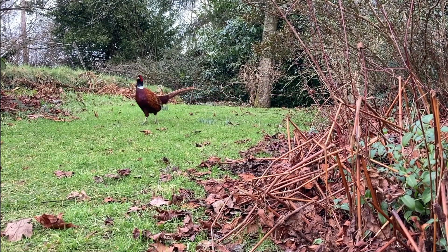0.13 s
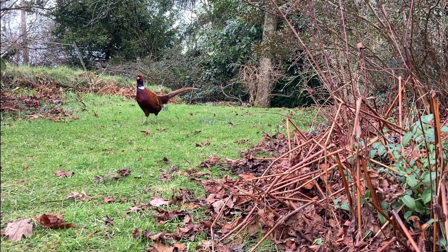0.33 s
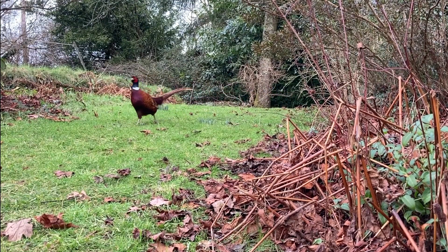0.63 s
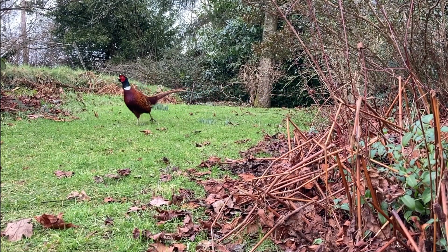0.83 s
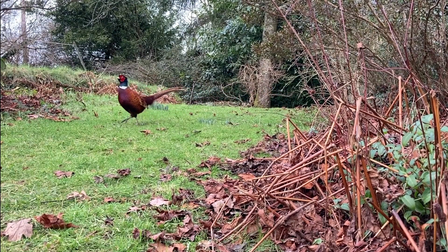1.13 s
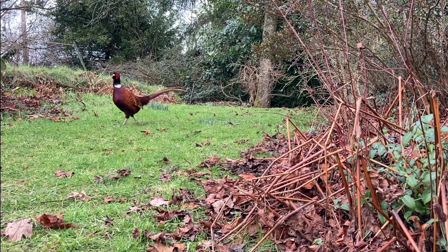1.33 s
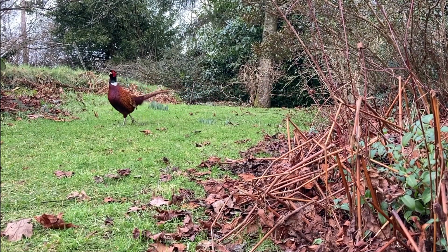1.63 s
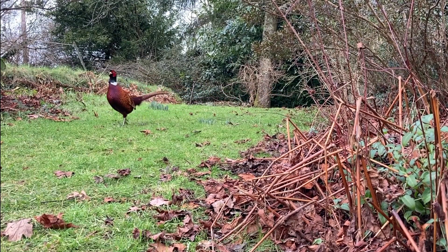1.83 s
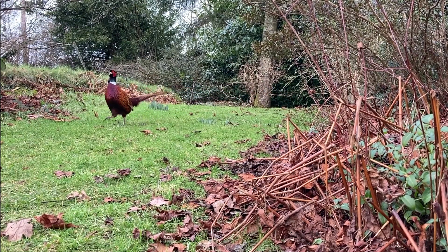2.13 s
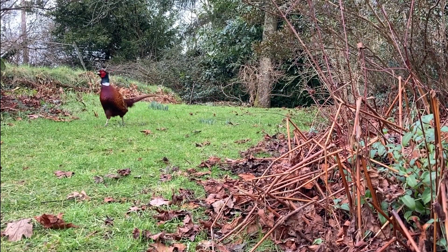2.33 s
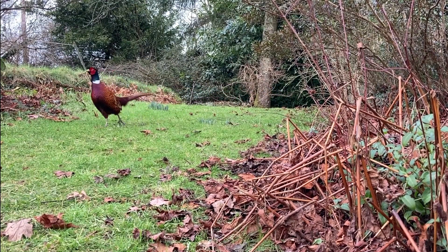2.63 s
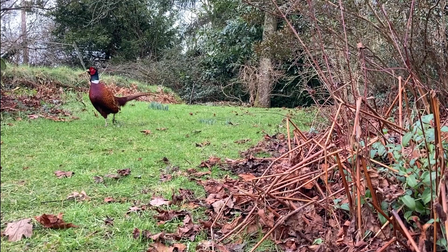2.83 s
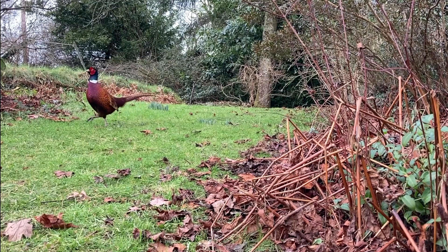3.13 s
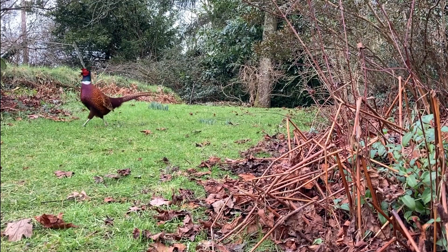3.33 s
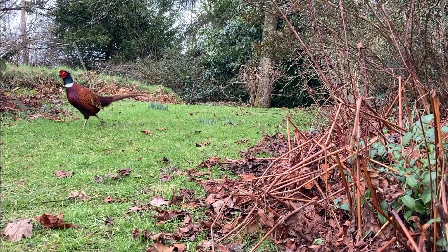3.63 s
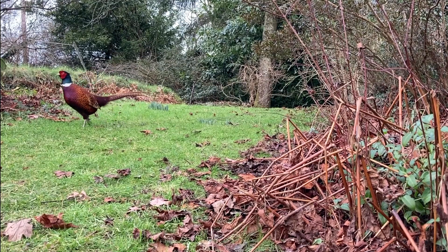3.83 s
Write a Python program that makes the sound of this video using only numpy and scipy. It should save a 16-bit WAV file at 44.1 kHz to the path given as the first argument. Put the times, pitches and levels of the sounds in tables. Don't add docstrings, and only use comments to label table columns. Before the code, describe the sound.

Pheasant cackle: a hurried run of short, raspy, falling clucks from 0 to 1.4 s, loudest at the start and receding. A far crow caws low at 0.2 s; soft wing thumps at 0.8 and 1.4 s. Two faint crow caws at 2.0 and 2.4 s, then one sharp nearer cluck at 3.0 s. A tiny leaf tick at 3.6 s. Quiet traffic rumble and air hiss throughout; light outdoor echo.

```python
import sys
import numpy as np
from scipy import signal
from scipy.fft import rfft, irfft, next_fast_len
from scipy.io import wavfile
from scipy.ndimage import uniform_filter1d, minimum_filter1d, map_coordinates

SR = 44100
rng = np.random.default_rng(int(sys.argv[2]) if len(sys.argv) > 2 else 0)


def master(y):
    cut = np.clip(np.atleast_2d(y).T, -1, 1)
    pcm = np.round(cut * 32767)
    wavfile.write(sys.argv[1], SR, pcm.astype(np.int16))


def boost(x):
    u = np.asarray(x, float) / 20
    return 10 ** u


N = 176400

# (time [s], level [dB])
TRAFFIC_LEVEL = [
    (0.0, -67),
    (0.19, -57.5),
    (0.3, -66),
    (0.62, -57),
    (0.68, -60.5),
    (0.77, -59.5),
    (4.0, -61.5),
]
# (frequency [Hz], level [dB per Hz])
TRAFFIC_COLOUR = [(12, -30), (20, -20), (35, -5.5), (59, 6), (113, -3), (166, -8), (195, -14), (300, -35.5),
                  (390, -88), (660, -120)]
# (frequency [Hz], level [dB per Hz])
AIR_COLOUR = [(150, -14), (250, -6), (1130, -19.5), (1250, -21.5), (1570, -23), (2780, -25), (8200, -33.5),
              (10700, -77), (18000, -120)]
# (frequency [Hz], level [dB per Hz])
AIR_WIDE_COLOUR = [(150, -29), (250, -2), (744, 4.5), (827, -8.5), (997, 1.5), (1550, -8.5), (6000, -14),
                   (7800, -59), (13200, -120)]
# (frequency [Hz], level [dB per Hz])
HISS_COLOUR = [(5000, -44), (7000, -5.5), (9000, -14), (12000, -0.5)]
# (time [s], level [dB])
LEAF_TICKS = [
    (2.996, -66),
    (3.636, -63),
]
# (time [s], pitch [Hz], level [dB])
WING_THUMPS = [
    (0.843, 95.6, -47.5),
    (1.438, 65.4, -50.5),
]
# (delay [s], level [dB])
BANK_ECHOES = [
    (.006, -3.5),
    (0.012, -4),
    (0.019, -13.5),
    (.034, -17.5),
    (0.046, -24),
    (0.064, -20.5),
]
# (frequency [Hz], time to fall 60 dB [s])
TREE_RING = [(500, 0.9), (1400, 0.45), (3500, 0.43), (9000, 0.37)]
# (time [s], length [s], pitch [Hz], level [dB])
CROW_CAWS = [
    (0.236, 0.14, 241.1, -50),
    (2.047, 0.181, 328.9, -55.5),
    (2.359, 0.176, 329.4, -60),
]
# (centre [Hz], width [Hz], level [dB])
BEAK_TONES = [(1300, 370, 4.5), (1760, 264, 5.5), (2176, 450, 2.5), (3007, 300, -0.5)]
# (time [s], length [s], first pitch [Hz], last pitch [Hz], level [dB])
CACKLE_CLUCKS = [(-.01, 0.04, 1435, 1374, -45), (.007, 0.026, 1399, 1018, -31.5),
                 (0.032, .03, 991.4, 885, -36), (0.057, .04, 1148, 900, -38.5),
                 (0.084, 0.039, 933, 751, -42.5), (0.172, 0.051, 1154, 771, -42.5),
                 (.225, .055, 1023, 705, -44.5), (.385, 0.041, 909, 632, -41.5),
                 (.405, .05, 1150, 720, -45), (.416, .066, 1380, 850, -35.5), (.565, .043, 1145, 699, -40),
                 (0.578, 0.05, 1170, 861.6, -39), (0.634, 0.046, 1121, 793, -41),
                 (0.687, .04, 1042, 802, -53), (0.719, 0.04, 1142, 663, -47),
                 (0.759, 0.046, 1068, 716, -49.5), (0.852, .05, 1194, 744, -42.5),
                 (.916, 0.033, 1300, 945, -48), (0.967, 0.034, 928, 638, -39.5),
                 (0.997, .045, 1060, 777, -57), (1.17, 0.057, 1182, 883, -40),
                 (1.316, 0.045, 1185, 634, -44), (1.348, 0.034, 891, 577, -51)]
# (frequency [Hz], level [dB])
FAR_THROAT_COLOUR = [(600, -2.5), (1200, -4), (1900, 8), (2650, 0.5), (3150, -14.5), (4300, -9.5),
                     (6500, -23.5), (11000, -29.5)]
# (centre [Hz], width [Hz])
FAR_PIPE = [(3080, 300), (6100, 860)]
# (time [s], length [s], first pitch [Hz], last pitch [Hz], level [dB])
COCK_CLUCK = [
    (2.995, 0.023, 1190, 1490, -64),
    (3.017, 0.028, 1401, 1077, -30),
    (3.046, 0.0232, 924, 753, -37),
]
# (frequency [Hz], level [dB])
NEAR_THROAT_COLOUR = [(800, -12), (1300, 1), (1700, 10.5), (2400, 8.5), (4200, -3), (5300, -8.5),
                      (7400, -6), (11000, -25.5)]
# (centre [Hz], width [Hz])
NEAR_PIPE = [(3100, 1160), (6000, 2200)]
# (low edge [Hz], high edge [Hz])
SUM_GAPS = [(8350, 9700), (11700, 23000)]
# (low edge [Hz], high edge [Hz])
DIFFERENCE_GAPS = [(6300, 7900), (10300, 23000)]

FAR_LAG_S, FAR_LAG_GROWS = 0.000098, 0.9e-4


def along(points, hz):
    f, value = np.transpose(points)
    return np.interp(np.log(hz + 1), np.log(f + 1), value)


def unit(x):
    return x / np.sqrt(np.mean(x ** 2) + 1e-20)


def wobble(n, rate_hz, rows=1):
    knots = rng.standard_normal((rows, 64 + int(4 * N / SR * 5)))
    at = np.arange(n) * rate_hz / SR
    return np.array([map_coordinates(k, [at], mode="wrap") for k in knots])


def filtered(x, response):
    m = next_fast_len(x.shape[-1] + 8192)
    spectrum = rfft(x, m) * response(np.fft.rfftfreq(m, 1 / SR))
    return irfft(spectrum, m)[..., :x.shape[-1]]


def noise(colour):
    return unit(filtered(rng.standard_normal(N), lambda f: boost(along(colour, f)) * (f < colour[-1][0])))


def add(out, x, s):
    i = round(s * SR)
    x = x[:, max(-i, 0):N - i]
    out[:, max(i, 0):max(i, 0) + x.shape[1]] += x


def stereo(mid, side):
    return np.array([mid + side, mid - side])


def traffic():
    s, db = np.transpose(TRAFFIC_LEVEL)
    swell_db = 1.6 * wobble(N, 4.52)[0]
    level = boost(np.interp(np.arange(N) / SR, s, db) + swell_db)
    wide = filtered(noise(TRAFFIC_COLOUR), lambda f: boost(6.5 * np.log2(f / 60 + 0.089)))
    return stereo(level * noise(TRAFFIC_COLOUR), level * boost(-21.5) * wide)


def air():
    level = boost(-71 + 0.29 * wobble(N, 2.16)[0])
    return stereo(level * noise(AIR_COLOUR), boost(-74) * noise(AIR_WIDE_COLOUR))


def microphone_hiss():
    return stereo(boost(-86) * noise(HISS_COLOUR), boost(-78.5) * noise(HISS_COLOUR))


def leaf_ticks():
    out, t = np.zeros((2, N)), np.arange(SR // 10) / SR
    t60_s = 0.013
    for s, db in LEAF_TICKS:
        add(out, boost(db - 60 * t / t60_s) * rng.standard_normal((2, len(t))), s)
    return out


def wing_thumps():
    out, t = np.zeros((2, N)), np.arange(SR // 10) / SR
    length_s = 0.041
    for s, hz, db in WING_THUMPS:
        swell = np.sin(np.pi * np.minimum(t / length_s, 1)) ** 2
        add(out, boost(db) * np.sin(2 * np.pi * hz * t) * swell * [[1], [1]], s)
    return out


def garden(x, lag_s, early_db, wet_db):
    hz, t, z = signal.stft(rng.standard_normal((2, int(0.6 * SR))), SR, nperseg=256)
    fade = boost(-60 * t / along(TREE_RING, hz)[:, None])
    tail = signal.istft(z * fade, SR, nperseg=256)[1]
    rise_s = 0.025
    tail = tail * np.minimum(np.arange(tail.shape[1]) / (rise_s * SR), 1)
    answer = boost(wet_db) * tail / np.linalg.norm(tail[0])
    chance = rng.uniform(-1, 1, (len(BANK_ECHOES), 3))
    for (s, db), (shift, skew, size) in zip(BANK_ECHOES, chance):
        i = round(s * (1 + 0.15 * shift) * SR)
        left_i = i + round(lag_s * SR + 3 * skew)
        answer[[0, 1], [left_i, i]] += boost(db + early_db + 3 * size)
    side = np.array([[-1], [1]])
    direct = filtered(np.pad(x, (0, 64)), lambda f: np.exp(1j * np.pi * f * lag_s * side))
    out = signal.fftconvolve(x[None], answer, axes=1)
    add(out, direct, 0)
    return out


def beak(f):
    total = 0
    for k, (centre, width, db) in enumerate(BEAK_TONES):
        total = total + (-1) ** k * boost(db) * 1j * f * width / (centre ** 2 - f * f + 1j * f * width)
    return total ** 2


def crow():
    out = np.zeros((2, N))
    for s, length, hz, db in CROW_CAWS:
        u = np.linspace(0, 1, int(length * SR))
        arch = np.sin(np.pi * u ** 0.781)
        jitter = 0.09 * wobble(len(u), 150)[0]
        turns = np.cumsum(hz * (1 + 0.0635 * (arch - 1) + jitter)) / SR
        pulses = unit(np.diff(np.floor(turns), prepend=0))
        breath = unit(rng.standard_normal(N // 8)[:len(u)] * (1 + np.cos(2 * np.pi * turns)))
        voice = unit(filtered(pulses + 0.57 * breath, beak)) * arch ** 2.9
        lag_s = FAR_LAG_S * (s < 1)
        add(out, garden(boost(db) * voice, lag_s, early_db=-2.5, wet_db=-12), s)
    return out


def cluck(length, first_hz, last_hz, throat, hold, rasp, breath, notches, tilt_db):
    t = np.arange(int(length * SR)) / SR
    u = t / length
    pitch = first_hz + (last_hz - first_hz) * np.sin(np.pi / 2 * u ** hold) ** 2
    turn = 2 * np.pi * np.cumsum(pitch) / SR
    k = np.arange(1, 15)[:, None]
    overtone_hz = k * pitch

    def effort_db(f):
        return tilt_db * np.log2(np.maximum(f / 3000, 1))

    gains = boost(along(throat, overtone_hz)) * (overtone_hz < 12000)
    gains = gains * (1 + rasp * wobble(len(t), 300, rows=len(k)))
    uneven_db = 2.5 * wobble(len(t), 40, rows=len(k))
    gains = gains * boost(uneven_db + effort_db(overtone_hz))
    stack = unit(np.sum(gains * np.sin(k * turn + k * k), 0))

    def breath_colour(f):
        rise_db = 0.5 * np.log2(f / 1000 + 0.01)
        return boost(along(throat, f) + rise_db + effort_db(f)) * (f > 500)

    puffs = rng.standard_normal(SR // 10)[:len(t)] * (1 + np.cos(turn))
    stack = stack + breath * unit(filtered(puffs, breath_colour))

    def windpipe(f):
        return np.prod([(c * c - f * f) / (c * c - f * f + 1j * f * w) for c, w in notches], 0)

    attack_s, release_s, fade_db = 0.0035, 0.0043, 5.5
    shape = np.clip(np.minimum(t / attack_s, (length - t) / release_s), 0, 1) * boost(-fade_db * u)
    return filtered(np.pad(stack * shape, (0, 200)), windpipe)


def far_cackle():
    out = np.zeros((2, N))
    balance = boost([[0.9 / 2], [-0.9 / 2]])
    for s, length, first_hz, last_hz, db in CACKLE_CLUCKS:
        sink = [1 - 0.11 * s, 1]
        throat, notches = np.array(FAR_THROAT_COLOUR) * sink, np.array(FAR_PIPE) * sink
        tilt_db = 0.5 * (db + 35)
        voice = cluck(length, first_hz, last_hz, throat, hold=1.15, rasp=0.2, breath=0.19,
                      notches=notches, tilt_db=tilt_db)
        lag_s = FAR_LAG_S + FAR_LAG_GROWS * s
        add(out, balance * garden(boost(db) * voice, lag_s, early_db=-6, wet_db=-7), s)
    return out


def near_cock():
    out = np.zeros((2, N))
    for s, length, first_hz, last_hz, db in COCK_CLUCK:
        tilt_db = 0.1 * (db + 31)
        voice = cluck(length, first_hz, last_hz, NEAR_THROAT_COLOUR, hold=0.53, rasp=0.15, breath=0.22,
                      notches=NEAR_PIPE, tilt_db=tilt_db)
        add(out, garden(boost(db) * voice, 0, early_db=-7, wet_db=-7.5), s)
    return out


def scene():
    background = traffic() + air() + microphone_hiss()
    return background + leaf_ticks() + wing_thumps() + crow() + far_cackle() + near_cock()


def lost_bands(db, centre):
    loud_db = -82.5
    scatter = unit(uniform_filter1d(rng.standard_normal(db.shape), size=3, axis=1))
    scatter = unit(uniform_filter1d(scatter, size=2, axis=2))
    loudest_near = -minimum_filter1d(-db.max(0), size=13, axis=0)
    mask_db = loudest_near - 24 + 4 * scatter
    lost = (db < mask_db) & (centre > 2400)
    quiet = (db < loud_db) & (centre > 4800) & (centre < 6200)
    lost |= quiet & (scatter > np.quantile(scatter, 0.75))
    for channel, gaps in enumerate((SUM_GAPS, DIFFERENCE_GAPS)):
        for lo, hi in gaps:
            low, high = 170 * rng.standard_normal((2, db.shape[2]))
            inside = (centre > lo + low) & (centre < hi + high)
            lost[channel] |= inside & ((db[channel] < loud_db) | (lo > 8000))
    return lost


def band_limit(x):
    return signal.sosfilt(signal.butter(12, 12300, fs=SR, output="sos"), x)


def record(dry):
    hz, _, z = signal.stft([dry[0] + dry[1], dry[0] - dry[1]], SR, nperseg=2048)
    bands = np.mean(abs(z[:, :1024].reshape(2, 128, 8, -1)) ** 2, 2)
    lost = lost_bands(10 * np.log10(bands + 1e-20), hz[4:1024:8, None])
    keep = np.repeat(boost(-73 * lost), 8, 1)
    keep = np.pad(keep, ((0, 0), (0, 1), (0, 0)))
    mid, side = signal.istft(z * keep, SR, nperseg=2048)[1][:, :N] / 2
    return band_limit(stereo(mid, side))


dry = scene()
out = record(dry)
master(out)
```